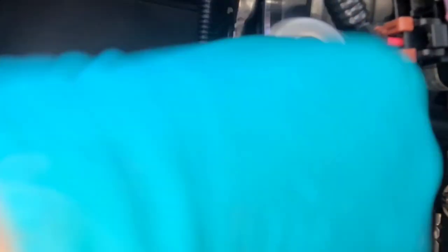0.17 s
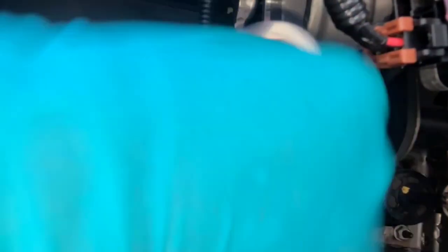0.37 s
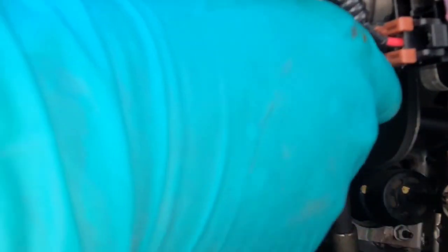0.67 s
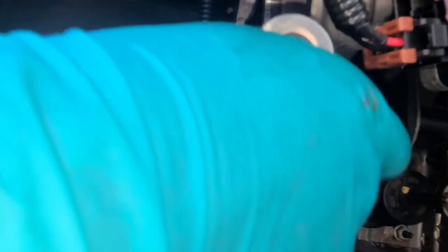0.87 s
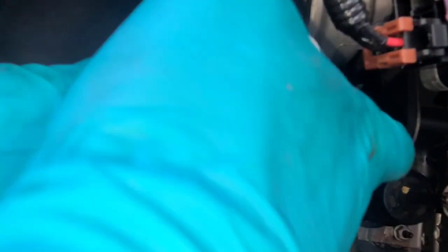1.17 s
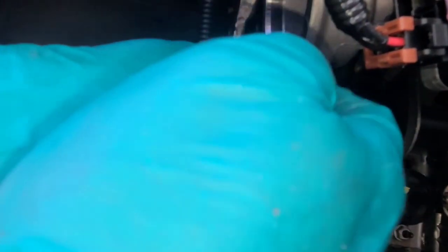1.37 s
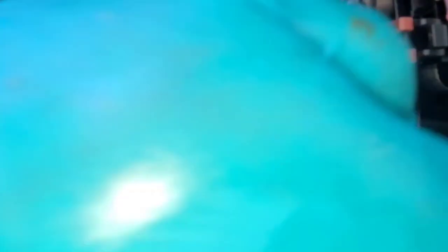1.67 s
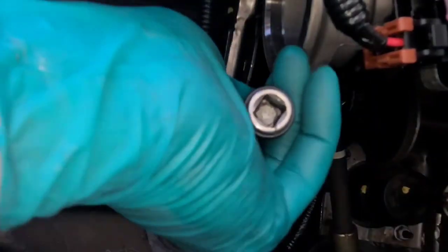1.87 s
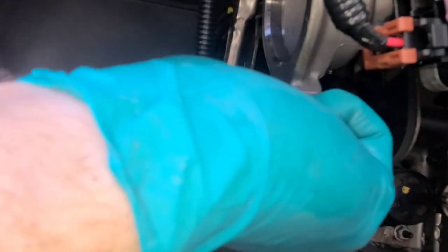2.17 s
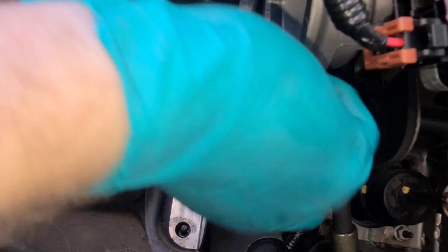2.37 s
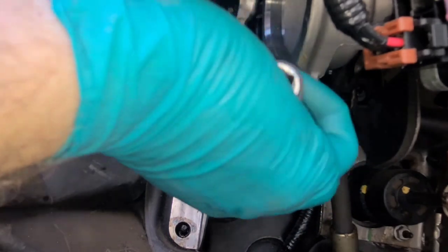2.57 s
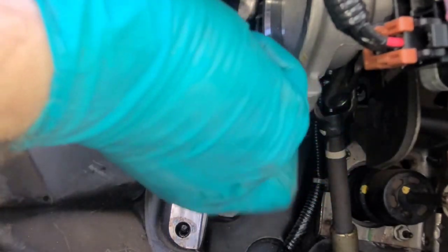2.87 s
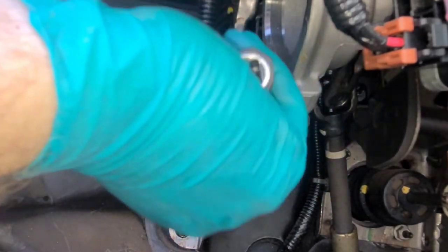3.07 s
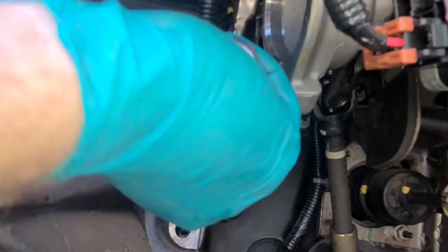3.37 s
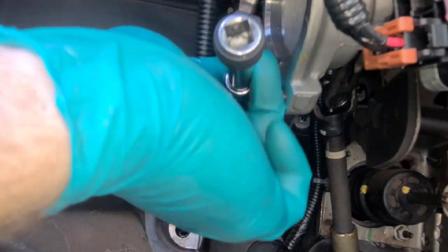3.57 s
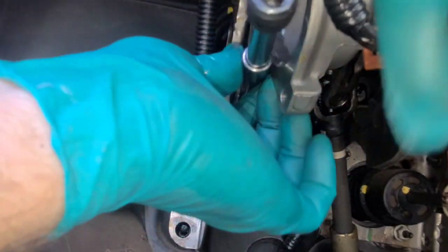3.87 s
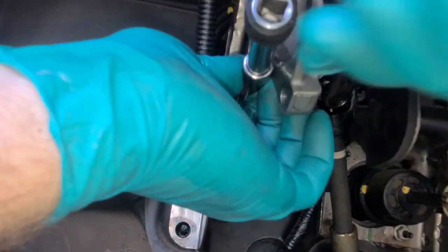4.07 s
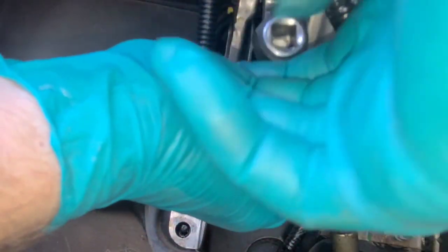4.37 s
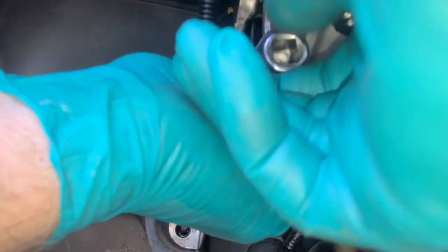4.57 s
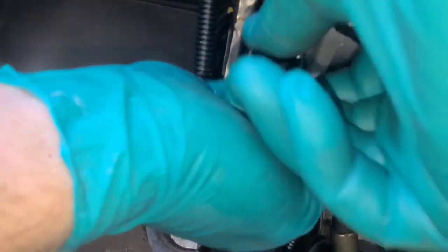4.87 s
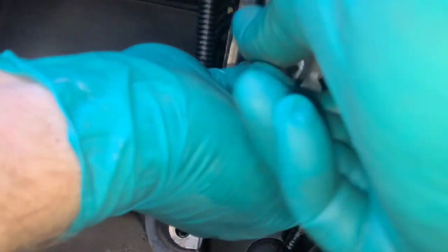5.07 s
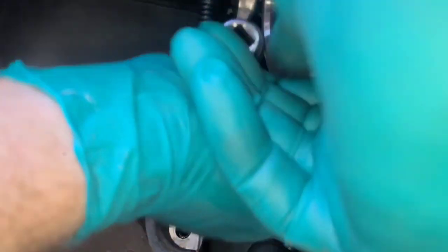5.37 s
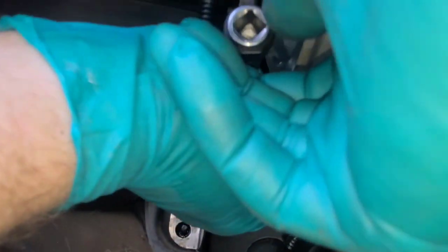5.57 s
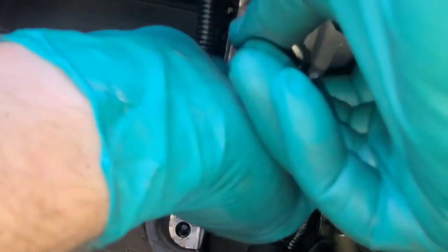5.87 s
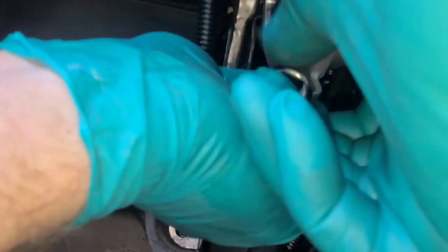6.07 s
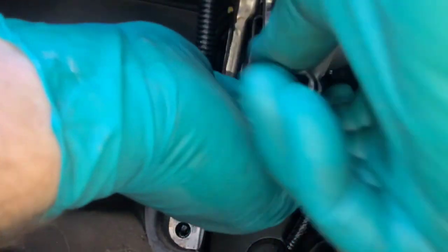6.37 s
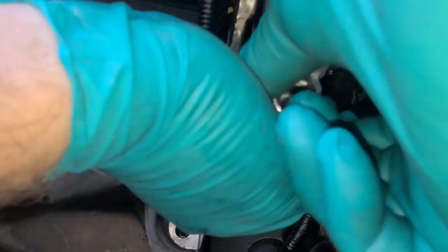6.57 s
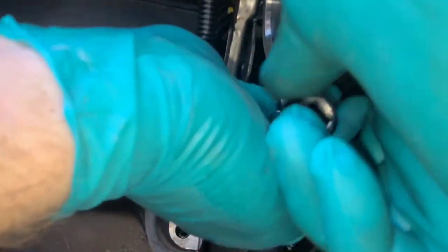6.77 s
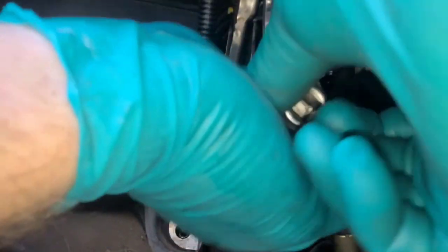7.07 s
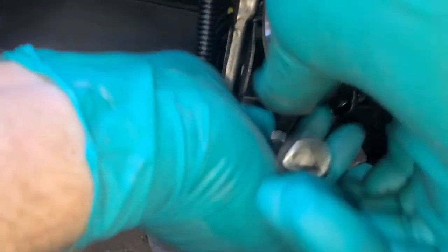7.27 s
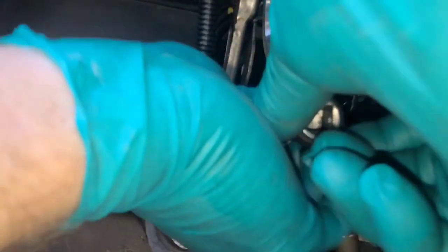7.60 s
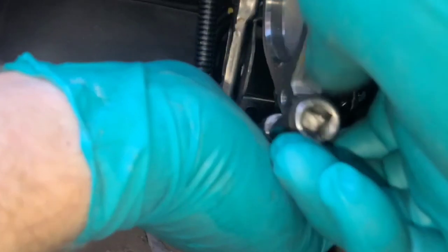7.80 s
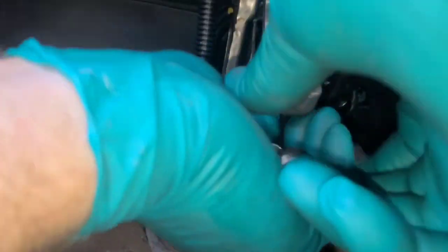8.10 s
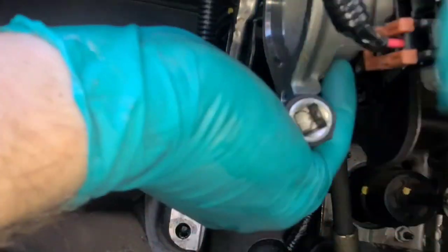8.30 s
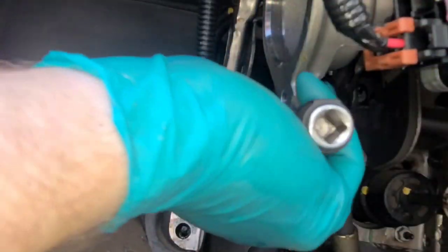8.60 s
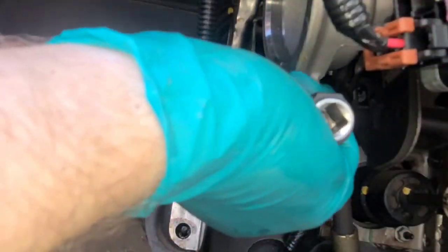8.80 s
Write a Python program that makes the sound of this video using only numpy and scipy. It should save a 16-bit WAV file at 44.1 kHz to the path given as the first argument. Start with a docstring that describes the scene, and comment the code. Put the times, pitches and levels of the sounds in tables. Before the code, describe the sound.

Very close stereo pickup in a car footwell. A burst of steel clacks, small clinks and panel thuds opens over a low rumble that quickly fades. Rubber gloves then rub and slip on a socket tool, with scattered clicks, a few springy twangs past two seconds, a quieter middle, and firmer dull clacks near the end. A soft, slightly wavering low hum and quiet room noise continue beneath.

```python
"""A steel clack, clink and panel thud burst in over a low rumble that soon dies away.
Gloved hands then turn a steel socket and extension on a bolt, close up in the footwell of a car.
Contacts are damped steel modes plus filtered noise; knocks and springy clips are decaying sines.
Rubber gloves rub and scuff as shaped noise and tiny random slips that ring the steel.
A low hum, one slightly unsteady sine, lies under it all with soft room noise."""
import sys
import numpy as np
from scipy import signal
from scipy.fft import rfft, irfft, next_fast_len
from scipy.io import wavfile
from scipy.ndimage import map_coordinates

SR = 44100
rng = np.random.default_rng(int(sys.argv[2]) if len(sys.argv) > 2 else 0)


def digitize_waveform(pressure):
    """Quantize a signal to 16-bit integers and store it at the path in sys.argv[1].

    Rows of a 2-D input are taken as channels; values are limited to [-1, 1].
    """
    field = np.atleast_2d(pressure).T
    bounded = np.clip(field, -1, 1)
    quanta = np.round(bounded * 32767).astype(np.int16)
    wavfile.write(sys.argv[1], SR, quanta)


N = 394254


def amp(db):
    """Decibels to gain."""
    return 10 ** (np.asarray(db) / 20)


def unit(x):
    """Scale to rms 1."""
    return x / np.sqrt(np.mean(x ** 2) + 1e-20)


def along(points, hz):
    """(Hz, value) points read on a log axis."""
    f, v = np.transpose(points)
    return np.interp(np.log(hz + 1), np.log(f + 1), v)


def curves(rows):
    """One value per sample for each column after the time."""
    s, *cols = np.transpose(rows)
    return [np.interp(np.arange(N) / SR, s, c) for c in cols]


def wobble(rate_hz, size=N):
    """A smooth random curve, rate_hz knots a second."""
    knots = rng.standard_normal(int(size * rate_hz / SR) + 4)
    return map_coordinates(knots, [np.arange(size) * rate_hz / SR])


def tilted(spectrum, slope_db):
    """The spectrum leaning by slope_db an octave, pivoting on its first point."""
    pivot_hz = spectrum[0][0]
    return [(hz, db + slope_db * np.log2(hz / pivot_hz)) for hz, db in spectrum]


def noise(spectrum, alike, size):
    """Coloured stereo noise of rms 1; alike is the left-right correlation."""
    m = next_fast_len(size + 512)
    gain = amp(along(spectrum, np.fft.rfftfreq(m, 1 / SR)))
    mid, side = irfft(rfft(rng.standard_normal((2, m))) * gain, m)[:, :size]
    turn = np.arccos(np.clip(alike, -1, 1)) / 2
    return unit(np.cos(turn) * mid + np.sin(turn) * np.array([side, -side]))


def add(track, s, sound):
    """Mix a sound into the track at time s."""
    start = max(round(s * SR), 0)
    part = track[:, start:start + sound.shape[-1]]
    part += sound[..., :part.shape[1]]


def walls(sound, db):
    """Nearby metal and plastic send back a few quick copies, different at each port."""
    echoes = np.zeros((2, SR // 100))
    for port in echoes:
        delays = rng.integers(SR // 2000, SR // 180, size=8)
        port[delays] = amp(db) * rng.choice([-1, 1], size=8)
    echoes[:, 0] = 1  # direct sound
    echoes /= np.linalg.norm(echoes[0])
    return signal.fftconvolve(sound, echoes, axes=1)[:, :sound.shape[1]]


# tool pressed on its bracket, modes: (frequency [Hz], relative level [dB], t60 [s])
STEEL_MODES = [(496.7, 4, 0.22), (624, -2.5, 0.096), (799.6, 10, 0.097), (917, 6.5, 0.1),
               (1116, 4.5, 0.053), (1230, 9, 0.055), (1428, 11.5, 0.077), (2323, 10, 0.063),
               (4070, 2, 0.047), (4950, 4, 0.057), (5400, 9, 0.031), (7330, 8.5, 0.045)]


def ring(spectrum, t60_s, hold_s, modes_db, tail_db, alike):
    """One register of a steel contact: damped modes and chatter, rms 1 over its first 10 ms."""
    t = np.arange(SR // 4) / SR
    hz, db, life_s = np.transpose(STEEL_MODES)
    shape = (2, len(hz))
    # each contact point excites the modes differently; each port hears its own mix
    spread_db = 3.6 * rng.standard_normal(len(hz)) + 2 * rng.standard_normal(shape)
    size = amp(db + along(spectrum, hz) + spread_db)
    phase = rng.uniform(0, 2 * np.pi, len(hz)) + rng.standard_normal(shape)
    hz = hz * (1 + 0.0055 * rng.standard_normal(len(hz)))  # grip shifts the modes
    waves = np.exp((2j * np.pi * hz - np.log(1000) / life_s)[:, None] * t)
    modes = ((size * np.exp(1j * phase)) @ waves).imag
    # faces chatter, then footwell reflections die away
    fade = amp(-60 * np.maximum(t - hold_s, 0) / t60_s) + amp(tail_db - 60 * t / 0.21)
    jitter = amp(3.17 * wobble(1000, size=len(t)))
    chatter = walls(noise(spectrum, alike, len(t)) * fade * jitter, db=-6.0)
    attack = 1 - np.exp(-t / 0.00036)
    sound = (chatter + amp(modes_db) * modes / np.linalg.norm(size)) * attack
    return sound / np.sqrt(np.mean(sound[:, :SR // 100] ** 2))


def ticks(spectrum, rate_hz, spread_db, count):
    """Tiny slips of uneven size at count spots, each ringing the tool faintly; rms 1."""
    out = np.zeros((2, N))
    for _ in range(count):
        hits = rng.random(N) < rate_hz / count / SR
        slips = hits * amp(spread_db * rng.random(N)) * np.sign(rng.standard_normal(N))
        tick = ring(spectrum, t60_s=0.071, hold_s=0, modes_db=-4.5, tail_db=-39.0, alike=0.27)
        out += signal.oaconvolve(slips[None], tick, axes=1)[:, :N]
    return unit(out)


# panel rumble spectrum, also under arm and gloves: (frequency [Hz], relative density [dB])
RUMBLE_SPECTRUM = [(30, -18.5), (110, 4), (165, 3.5), (245, -10), (700, -59.5)]


def thud(db, hz):
    """A push on the bracket sets a panel swinging in two modes; its neighbours rumble along."""
    t = np.arange(SR // 4) / SR
    swing = np.sin(2 * np.pi * hz * t) + 0.12 * np.sin(2 * np.pi * 2.106 * hz * t)
    swing = swing * amp(-60 * t * hz / 11)  # t60 of 11 cycles
    panels = noise(RUMBLE_SPECTRUM, 0.99, len(t)) * amp(-60 * t / 0.39)
    sound = (swing + 0.15 * panels) * (1 - np.exp(-t * hz / .5))
    return amp(db + 1.5) * sound / np.abs(sound).max()


# room noise spectrum, also the cabin boom: (frequency [Hz], relative density [dB])
ROOM_SPECTRUM = [(12, -9), (56, 18), (80, 10.5), (200, -5.5), (1500, -37.5), (15000, -61.5)]
SETTLE_DB, SETTLE_DB_PER_S = -28, 20.5  # start level, decay rate


def arm():
    """The forearm rumbles against the trim, booms in the cabin and comes to rest."""
    t = np.arange(N) / SR
    level = amp(SETTLE_DB - SETTLE_DB_PER_S * t + wobble(26.0))
    return level * (noise(RUMBLE_SPECTRUM, 0.97, N) + noise(ROOM_SPECTRUM, 1, N))


# hum, sagging a little: (time [s], frequency [Hz], mean level [dB])
HUM_SAG = [(2.0, 126.2, -39.5), (3.3, 121.8, -44.5)]


def background():
    """A low sine hum, unsteady in level and phase, over soft room noise."""
    hz, db = curves(HUM_SAG)
    phase = 2 * np.pi * np.cumsum(hz) / SR + .5 * wobble(1.96)
    hum = amp(db + wobble(1.6)) * np.sin(phase)
    return hum + amp(-45.5) * noise(ROOM_SPECTRUM, 0.98, N)


# fingers stop to change grip: (middle [s], length [s])
GRIP_PAUSES = [(0.56, 0.055), (2.306, 0.033), (3.695, 0.093), (4.134, 0.071), (7.002, 0.15), (8.387, 0.091)]
PAUSE_DB = -12


def holding():
    """Gain of the light, lasting glove contact: drifts with finger pressure, ebbs in each pause."""
    t = np.arange(N) / SR
    pause = sum(np.exp(-(2 * (t - s) / length_s) ** 4) for s, length_s in GRIP_PAUSES)
    return amp(1.8 * wobble(6) + PAUSE_DB * pause)


# glove strokes over the tool:
# (start [s], length [s], relative drag level [dB], relative hiss level [dB])
GLOVE_STROKES = [(0.594, 0.17, -45.5, -60.5), (0.861, 0.11, -36.5, -42), (1.056, 0.23, -49, -53),
                 (1.394, 0.29, -45.5, -50.5), (1.733, 0.37, -47.5, -50), (2.388, 0.25, -45, -52.5),
                 (2.624, 0.1, -41.5, -44), (4.246, 0.44, -54.5, -52.5), (4.87, 0.14, -48.5, -80),
                 (5.856, 0.095, -39, -49), (6.128, 0.035, -38.5, -50.5), (6.42, 0.16, -45.5, -56.5),
                 (6.714, 0.17, -46.5, -54.5), (7.05, 0.5, -46.5, -57), (7.786, 0.32, -40, -55),
                 (8.093, 0.25, -50.5, -54), (8.598, 0.29, -41.5, -56.5)]
STROKE_ATTACK_S, STROKE_RELEASE_S = 0.059, 0.066


def strokes():
    """Drag and hiss gains: each stroke takes hold, slides evenly and lets go."""
    t, power = np.arange(N) / SR, np.zeros((2, N))
    for s, length_s, drag_db, hiss_db in GLOVE_STROKES:
        take = np.clip((t - s) / STROKE_ATTACK_S + .5, 0, 1)
        release = np.clip((s + length_s - t) / STROKE_RELEASE_S + .5, 0, 1)
        power += (amp([[drag_db], [hiss_db]]) * take * release) ** 2
    return np.sqrt(power)


# rubber drag and hiss spectra: (frequency [Hz], relative density [dB])
DRAG_SPECTRUM = [(120, -18), (300, 5.5), (750, 1), (2200, -12), (5000, -34.5)]
HISS_SPECTRUM = [(700, -28.5), (2000, 3), (4500, 1), (15000, -3)]
HOLD_DRAG_DB, HOLD_HISS_DB, HOLD_RUMBLE_DB = -59.5, -61, -47.5  # gloves merely holding, relative
SHAKE_DB = 5  # panel rumble re stroke drag gain
GRIT_DB, GRIT_RATE_HZ = -6, 280  # fine catches ringing the steel, re hiss


def gloves():
    """Rubber drags over metal in tiny uneven slips; the harder it drags, the more the panels shake."""
    pull, slide = strokes()
    hold, grip = holding(), wobble(28)
    friction = np.hypot(pull, amp(HOLD_DRAG_DB) * hold)
    smear = unit(walls(amp(6.5 * wobble(170)) * noise(DRAG_SPECTRUM, 0.71, N), db=0.0))
    slips = ticks(tilted(CLACK_SPECTRUM, -4.5), rate_hz=230, spread_db=24.5, count=4)
    drag = friction * amp(2.5 * grip) * (amp(-2.0) * smear + amp(-3.5) * slips)
    fizz = unit(walls(amp(3.7 * wobble(600)) * noise(HISS_SPECTRUM, 0, N), db=-2.5))
    grit = ticks(CLINK_SPECTRUM, rate_hz=GRIT_RATE_HZ, spread_db=12, count=4)
    fizz = unit(fizz + amp(GRIT_DB) * grit)
    hiss = np.hypot(slide, amp(HOLD_HISS_DB) * hold) * amp(5.0 + 1.5 * grip) * fizz
    shake = np.hypot(amp(SHAKE_DB) * pull, amp(HOLD_RUMBLE_DB) * hold)
    rumble = shake * amp(grip) * noise(RUMBLE_SPECTRUM, 0.98, N)
    return drag + hiss + rumble


# contact register spectra: (frequency [Hz], relative density [dB])
CLACK_SPECTRUM = [(150, -37), (300, -6.5), (600, -1), (1250, 0.5), (1900, -3), (2500, -7), (4500, -49)]
CLINK_SPECTRUM = [(1300, -59), (2200, -13), (2900, -2.5), (4400, -2), (7000, -8.5), (10500, -31.5)]
SIZZLE_SPECTRUM = [(4200, -48), (7000, -11.5), (12500, -9.5), (16000, -23.5)]
# steel contacts: (time [s], relative level [dB], hardness as relative tilt [dB/octave],
# clink freed by a looser grip [dB])
STEEL_CONTACTS = [(0.001, -11, -4, -1), (0.101, -23, 2, -0.5), (0.138, -33.5, -2.5, 2.5),
                  (0.259, -13, -5, -4.5), (0.281, -15.5, -4, -2), (0.351, -45.5, 7, -3),
                  (0.415, -12, -3.5, 1), (0.444, -17, -5.5, -9), (0.736, -32.5, -0.3, 4.5),
                  (0.79, -31, -9.5, 0), (0.99, -24, -4.5, -3), (1.174, -21.5, -7, 0), (2.008, -13, -5, 0.5),
                  (2.244, -32.5, -4.5, -1.5), (2.344, -29.5, -4, -6.5), (2.497, -13.5, -9, -8),
                  (2.584, -18, -12.5, 2.5), (2.605, -27, -16, -8), (2.855, -29.5, -3, -4),
                  (2.908, -21, -4, 6), (3.043, -28.5, -6, 9), (3.159, -35.5, -3.5, 0), (3.209, -19, 0.3, 4),
                  (3.217, -13.5, -5, 1), (3.565, -30, -3.5, 2.5), (3.923, -19, -7, 7),
                  (3.944, -16, -1, 0.5), (3.952, -13.5, -0.5, -2), (4.254, -29, -6.5, 2.5),
                  (4.904, -39, -7, -1), (4.942, -27.5, -12.5, 2), (5.11, -34, -11, 7),
                  (5.246, -38.5, -9.5, -3), (5.318, -18, 2, 0.5), (5.34, -14, -1, -1), (5.872, -30, -2, 2),
                  (5.899, -22.5, -10, 6), (6.029, -30, -9, 2), (6.11, -30, -6.5, -7),
                  (6.421, -37.5, -5, -4), (6.873, -7, -7, -2), (7.082, -26.5, -3.5, 0),
                  (7.12, -14, -6, -2.5), (7.416, -7.5, -4, -5), (7.726, -8.5, -8.5, 0),
                  (7.754, -27, -3.5, -1.5), (8.128, -30.5, -4, -5), (8.326, -9, -6, 0),
                  (8.481, -24.5, -8, -3), (8.592, -11.5, -7, -2), (8.746, -36.5, -4.5, 5)]
CLINK_OCTAVES, SIZZLE_OCTAVES = 1.86, 3.27  # register height above the clack
PANEL_HZ = 165.1  # panel behind the bracket, shaken by every clack and scuff
CLACK_THUD_DB, SCRAPE_THUD_DB, THUD_LAG_S = -8, 0.5, 0.0032  # its answer, relative levels


def contacts():
    """The hand-damped tool clacks when it seats and clinks when bare edges meet; the panel answers."""
    out = np.zeros((2, N))
    for s, db, hardness, loose_db in STEEL_CONTACTS:
        # harder, shorter contacts favour higher modes
        colour = tilted(CLINK_SPECTRUM, 1.68 * hardness + 5.4)
        clack = ring(CLACK_SPECTRUM, t60_s=0.062, hold_s=0.0037, modes_db=5.5, tail_db=-15.0, alike=0.38)
        clink = ring(colour, t60_s=0.062, hold_s=0.00055, modes_db=1.5, tail_db=-35.5, alike=0.068)
        sizzle = ring(SIZZLE_SPECTRUM, t60_s=0.045, hold_s=0.0017, modes_db=-9.5, tail_db=-30.0, alike=0.27)
        clack *= amp(db - 7.5)
        clink *= amp(db + CLINK_OCTAVES * hardness + loose_db)
        sizzle *= amp(db + SIZZLE_OCTAVES * hardness - 4.0)
        add(out, s, clack + clink + sizzle)
        add(out, s + THUD_LAG_S, thud(db + CLACK_THUD_DB, PANEL_HZ))
    return out


SING_T60_S, SING_ATTACK_S = 0.063, 0.00081


def sing(modes, strikes):
    """A part struck while the fingers hold it loosely rings on in a few clear modes."""
    out, t = np.zeros((2, N)), np.arange(SR // 4) / SR
    hz = np.transpose(modes)[0]
    fade = amp(-60 * t / SING_T60_S) * (1 - np.exp(-t / SING_ATTACK_S))
    for s, db, hardness in strikes:
        mode_db = np.transpose(tilted(modes, hardness))[1]
        size = amp(db + mode_db + 2 * rng.standard_normal((2, len(hz))))
        held_hz = hz * (1 + 0.0041 * rng.standard_normal(len(hz)))  # grip shifts the modes
        waves = fade * np.exp(2j * np.pi * held_hz[:, None] * t)
        phase = 2 * np.pi * rng.random(size.shape)
        add(out, s, ((size * np.exp(1j * phase)) @ waves).imag)
    return out


# free modes of the two parts: (frequency [Hz], relative level [dB])
EXTENSION_MODES = [(2390, 1), (2720, -7.5), (4080, 5.5), (4750, -4)]
SOCKET_MODES = [(3190, -0.5), (4330, -12.5), (4885, 1), (5120, -8), (6300, -5), (7540, -9.5), (10020, -7),
                (11190, -3), (11520, -2.5), (12500, 0.5)]
# strikes on each part: (time [s], relative level [dB], hardness as tilt [dB/octave])
EXTENSION_STRIKES = [(0.259, -13.5, -4), (0.417, -23.5, 9), (4.904, -32.5, -24), (4.962, -35, -17),
                     (5.899, -24, -6), (8.325, -24, 8), (8.592, -17.5, 5)]
SOCKET_STRIKES = [(0.002, -20.5, -1.5), (0.098, -16, 2.5), (0.736, -30, 1.5), (3.952, -18.5, -2.5),
                  (5.321, -22, -1)]


def clinks():
    """Extension and socket, loosely held, each ring in their own modes."""
    return sing(EXTENSION_MODES, EXTENSION_STRIKES) + sing(SOCKET_MODES, SOCKET_STRIKES)


# heavy knocks on the surrounding panels: (time [s], relative level [dB], pitch [Hz])
PANEL_KNOCKS = [(0.004, -13.5, 135), (0.326, -16, 108), (0.415, -7.5, 163), (0.62, -16.5, 168),
                (0.67, -16.5, 134), (0.852, -23.5, 114), (0.924, -18.5, 107), (2.008, -8, 228),
                (2.247, -20.5, 212), (2.562, -13.5, 108), (3.213, -18, 242), (3.22, -14.5, 109.5),
                (3.255, -18.5, 99.7), (3.958, -20, 121), (5.343, -14, 200), (5.375, -37, 108),
                (6.809, -21, 136), (7.084, -20, 200), (7.73, -14, 121), (8.002, -15, 159),
                (8.726, -24, 164)]


def knocks():
    """Hand and tool bump the panels, each knock with its own pitch."""
    out = np.zeros((2, N))
    for s, db, hz in PANEL_KNOCKS:
        add(out, s, thud(db, hz))
    return out


# short glove scuffs: (time [s], relative hiss level [dB], scrape re hiss [dB])
GLOVE_SCUFFS = [(0.0205, -18.5, -23), (0.047, -24.5, -30), (0.324, -30, -6), (0.364, -29.5, -3),
                (0.889, -45, 14), (1.602, -41.5, 8), (2.0566, -31.5, 6), (3.757, -42.5, -21),
                (4.395, -31.5, -6), (5.481, -34.5, -3.5), (5.746, -37.5, -41), (5.8654, -37, -6),
                (7.097, -23, 5.5), (7.6186, -27.5, 7.5), (7.642, -27.5, 5), (7.963, -32, 4.5),
                (7.992, -33, 8)]


def scuffs():
    """A fingertip slips over the knurled steel in one short gritty swell and tugs at the panel."""
    out = np.zeros((2, N))
    u = np.arange(SR // 8) / SR / 0.0081  # time in units of the rise
    for s, db, scrape_db in GLOVE_SCUFFS:
        swell = u * np.exp(1 - u) * amp(1.2 * wobble(450, size=len(u)))
        hiss = noise(HISS_SPECTRUM, 0, len(u))
        scrape = amp(scrape_db) * noise(DRAG_SPECTRUM, 0.32, len(u))
        add(out, s, amp(db - 5.5) * walls(swell * (hiss + scrape), db=-10.5))
        add(out, s + THUD_LAG_S, thud(db + scrape_db + SCRAPE_THUD_DB, PANEL_HZ))
    return out


# springy clips and brackets nudged by the hand:
# (time [s], pitch [Hz], relative level [dB], t60 of the sustained part [s])
CLIP_PLUCKS = [(2.078, 708, -29, 0.052), (2.243, 367, -26.5, 0.31), (2.345, 910, -29.5, 0.036),
               (2.414, 900, -41, 0.046), (2.499, 1460, -20.5, 0.043), (3.951, 650, -24, 0.16)]


def plucks():
    """A springy part is nudged softly, swings up within a cycle and sings on."""
    out, t = np.zeros((2, N)), np.arange(SR // 3) / SR
    for s, hz, db, t60_s in CLIP_PLUCKS:
        fade = amp(-60 * t / 0.039) + 0.28 * amp(-60 * t / t60_s)
        attack = 1 - np.exp(-2 * t * hz)
        wave = np.sin(2 * np.pi * hz * t + .5 * wobble(120, size=len(t)))
        add(out, s, amp(db + 5) * fade * attack * wave)
    return out


def scene():
    """The tool lies a little to the right of the microphones; the rest is not panned."""
    tool = (contacts() + clinks() + scuffs()) * amp([[-.5], [.5]])
    return tool + knocks() + plucks() + gloves() + arm() + background()


TOP_HZ = 15900  # inside the steep treble cut


def record(dry):
    """Peaks round off near full scale, then a steep low-pass cuts the top treble."""
    held = dry / (1 + np.abs(dry) ** 6) ** (1 / 6)
    m = next_fast_len(N + SR // 2)
    cut = [(TOP_HZ - 300, 0), (TOP_HZ + 600, -35), (TOP_HZ + 1300, -120)]  # (Hz, dB)
    gain = amp(along(cut, np.fft.rfftfreq(m, 1 / SR)))
    return irfft(rfft(held, m) * gain, m)[:, :N]


dry = scene()
out = record(dry)
digitize_waveform(out)
```